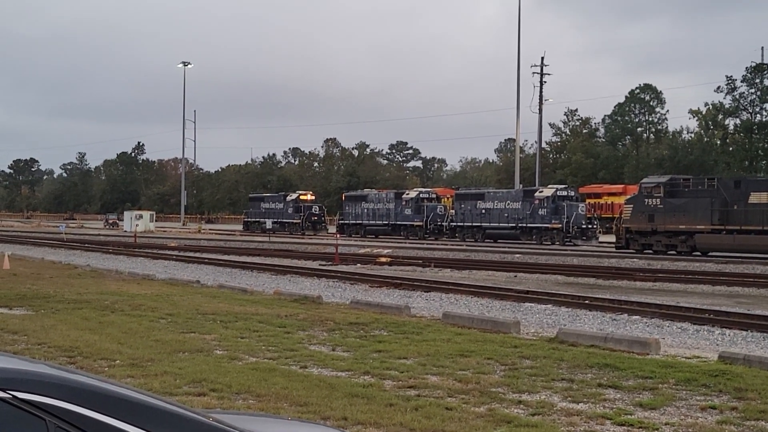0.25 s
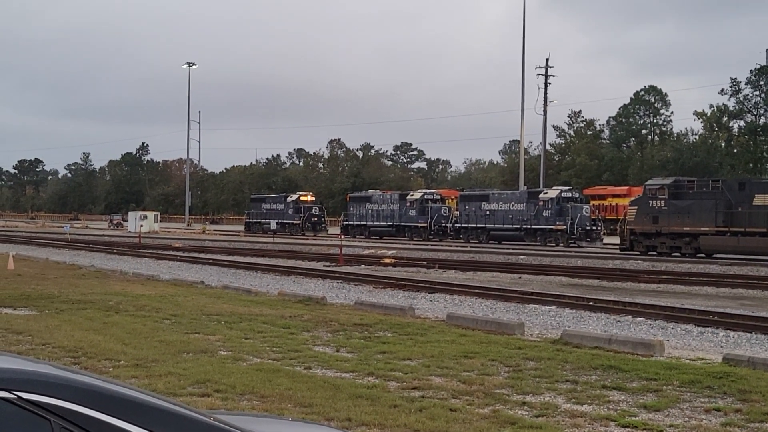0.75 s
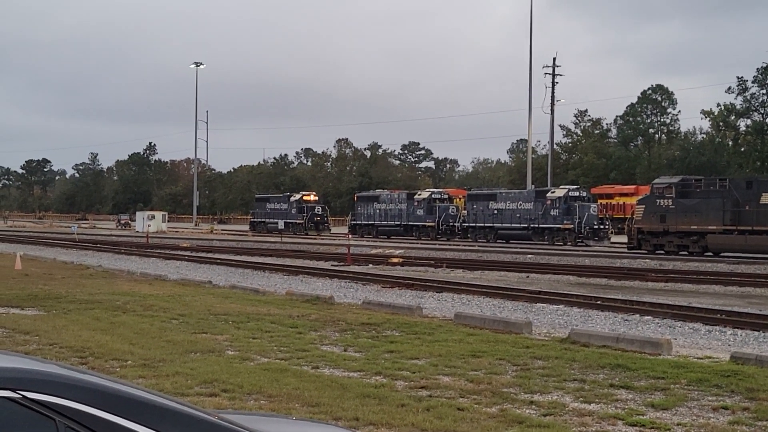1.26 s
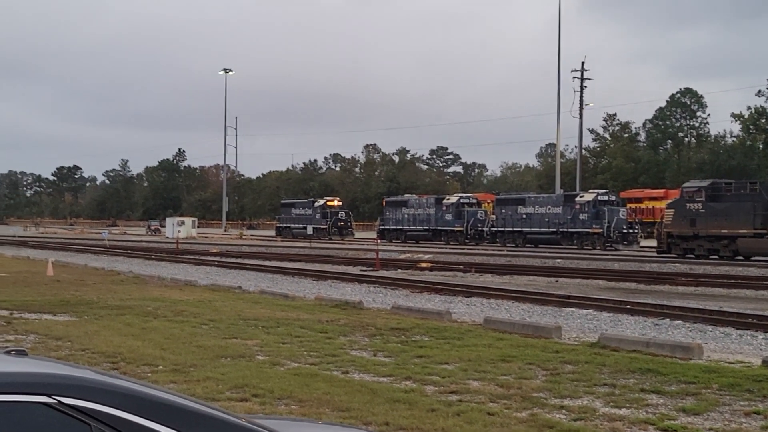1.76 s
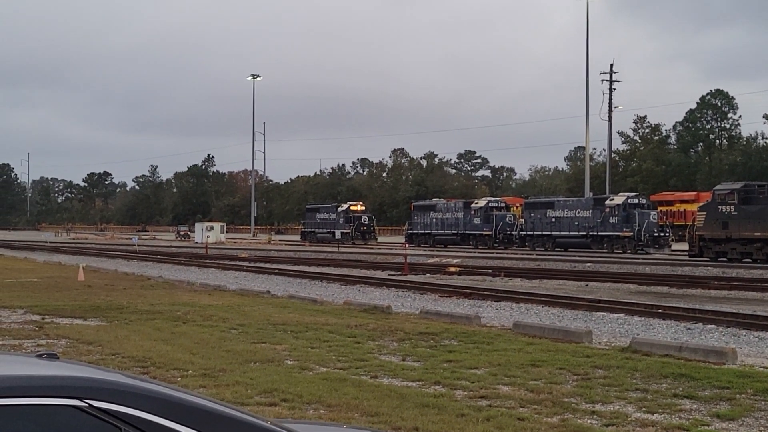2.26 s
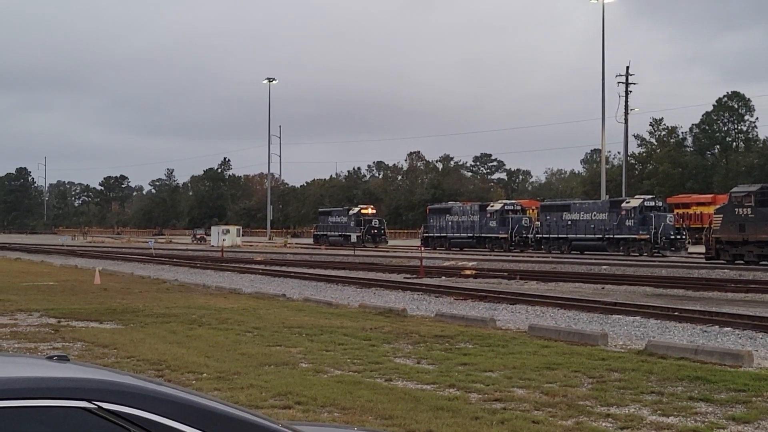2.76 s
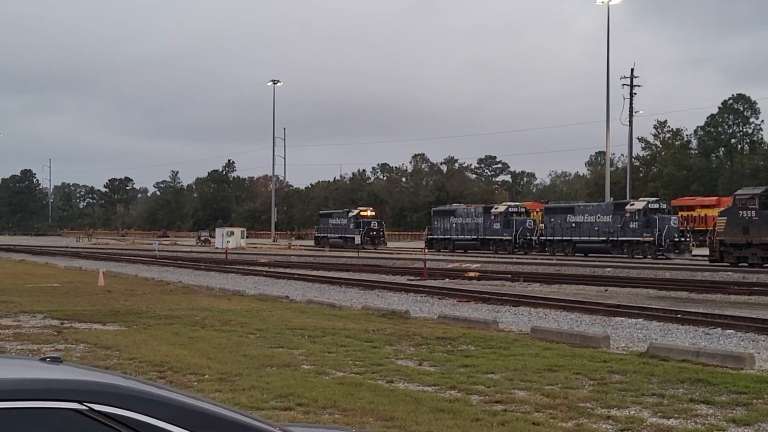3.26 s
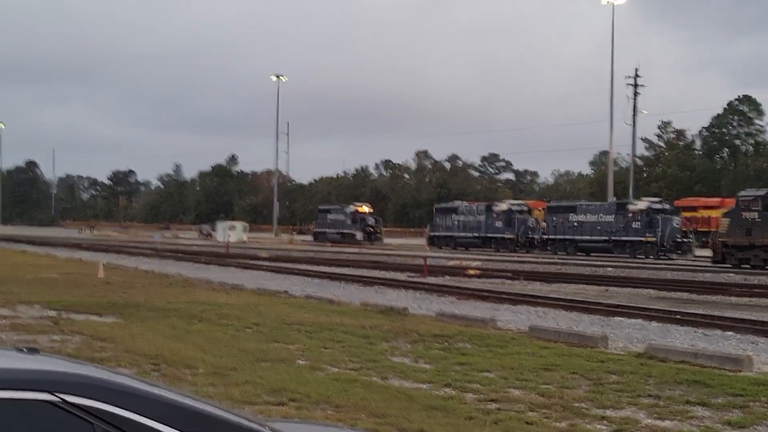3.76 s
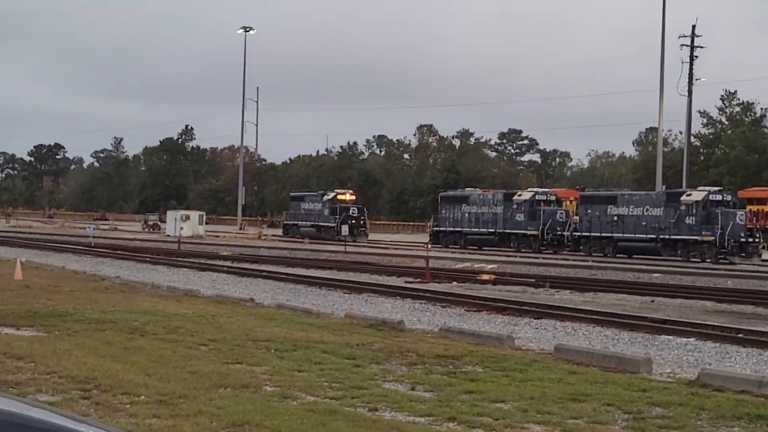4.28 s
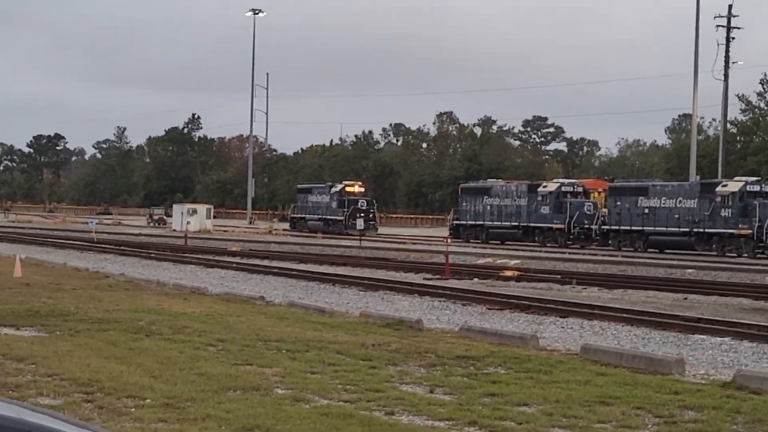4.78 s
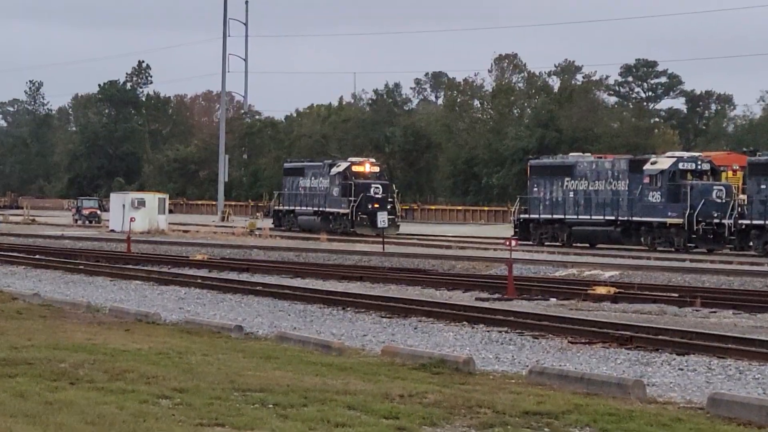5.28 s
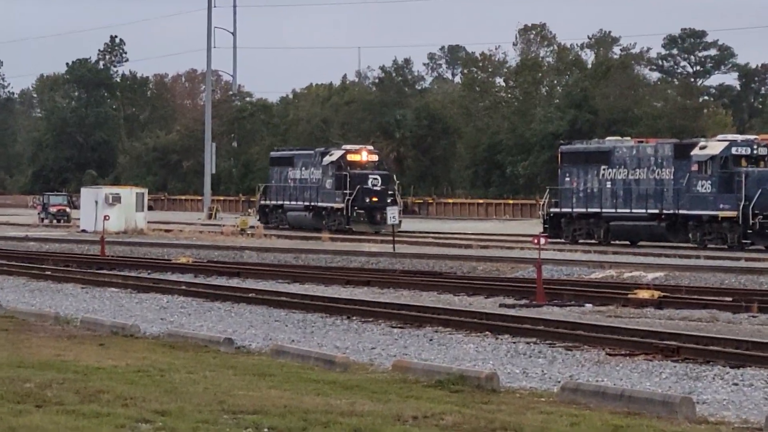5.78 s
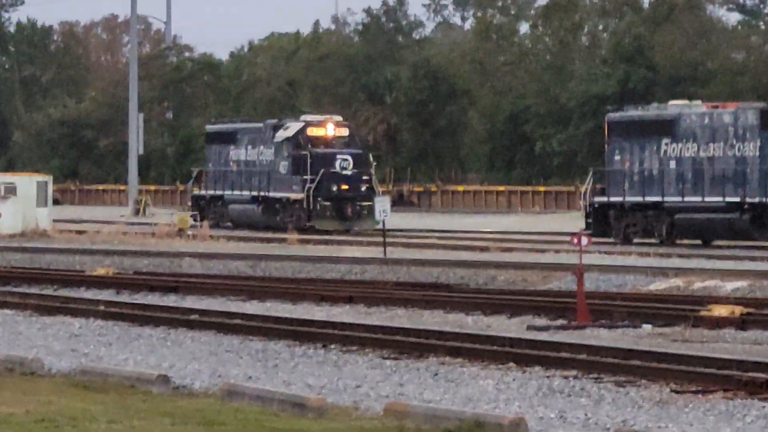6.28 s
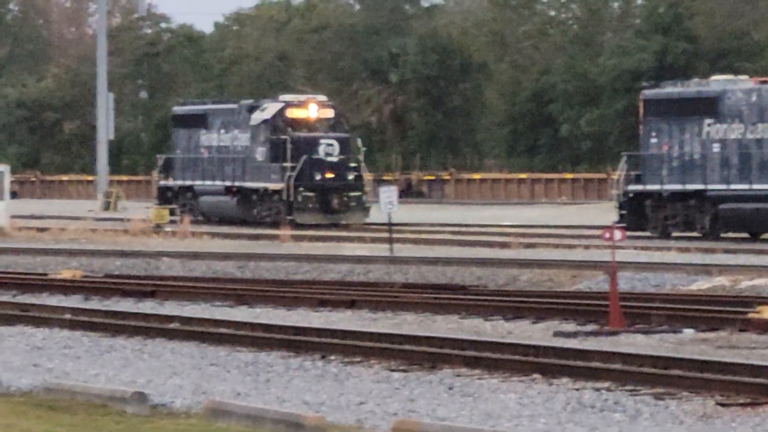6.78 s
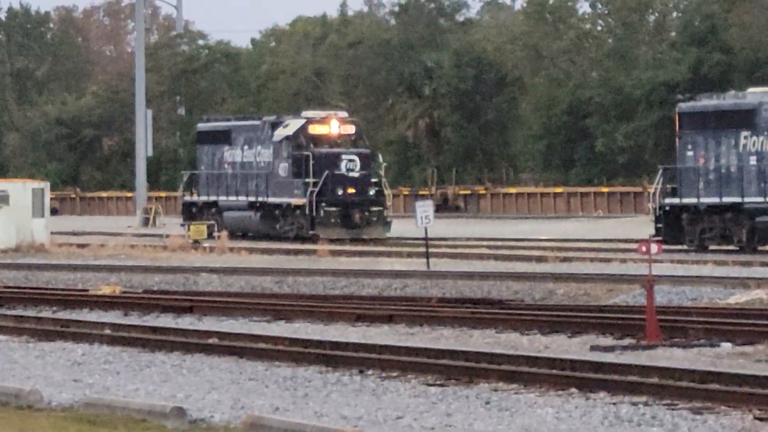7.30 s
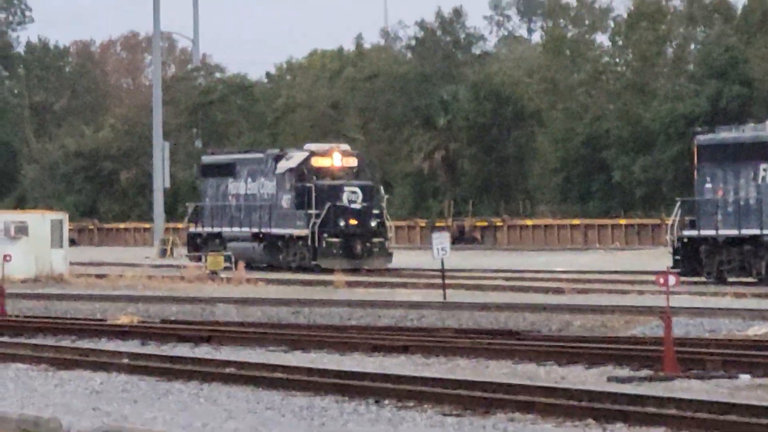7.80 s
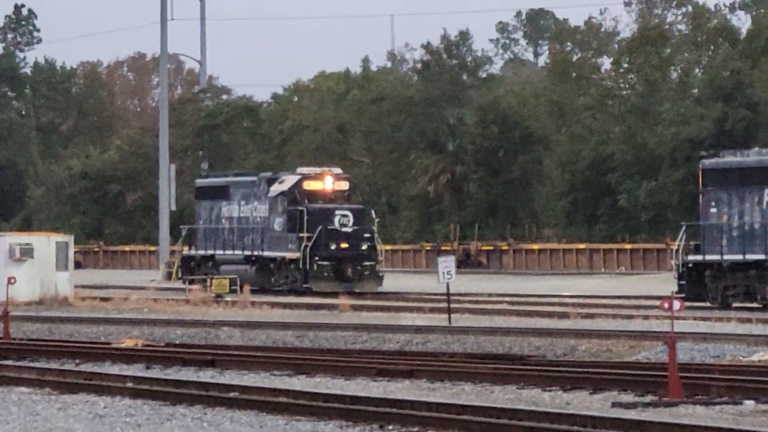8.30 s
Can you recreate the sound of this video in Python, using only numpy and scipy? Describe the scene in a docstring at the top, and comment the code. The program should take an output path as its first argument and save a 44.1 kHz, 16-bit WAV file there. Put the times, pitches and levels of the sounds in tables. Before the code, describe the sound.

Several diesel locomotives idle across an open rail yard with a steady, low throb. Couplers clank a few times and a brake shoe scrapes briefly, then the rumble grows a little as one unit creeps closer. Air valves let out short hisses, one engine winds down to a lower idle, and wheel flanges sing faintly. In the last seconds a light breeze thumps on the microphone.

```python
"""Four diesel locomotives throb across a rail yard, their exhaust tones beating against each other.
Early on a thin whistle comes and goes, and air valves begin to spit. Near 3 s couplers clank and one
unit starts to creep closer, so roar, fans and running gear grow. A brake shoe scrapes until about 4 s.
Then another engine winds down to low idle, its whine sinking with it, while wheel flanges sing and the
camera ticks as it is handled. From 6 s on, a light breeze buffets the microphone more often."""
import sys
import numpy as np
from scipy import signal
from scipy.fft import rfft, irfft, next_fast_len
from scipy.io import wavfile
from scipy.ndimage import uniform_filter1d, map_coordinates

SR = 44100
rng = np.random.default_rng(int(sys.argv[2]) if len(sys.argv) > 2 else 0)


def master_out(mix):
    """Clip the mix to full scale and print it as 16-bit PCM to the path in sys.argv[1]."""
    frames = np.transpose(np.atleast_2d(mix))
    ceiling = np.clip(frames, -1, 1)
    pcm = np.round(ceiling * 32767).astype(np.int16)
    wavfile.write(sys.argv[1], SR, pcm)


N = 376878

# The slowing engine's speed. Each row: time in seconds, working cycles per second.
SLOWING_SPEED = [(0, 3.177), (4.2, 3.172), (4.8, 3.14), (5.3, 3.06), (5.7, 2.95), (6.05, 2.8), (6.5, 2.64),
                 (7, 2.595), (8.55, 2.58)]
# Each engine's exhaust tones. Each row: multiple of its cycle rate, relative level in dB.
SLOWING_TONES = [(15, -41), (16, -27.5), (18, -32), (20, -37.5), (21, -38), (24, -41), (25, -37),
                 (26, -34.5), (28, -47), (30, -30.5), (32, -39), (34, -32.5), (48, -37)]
IDLE_TONES = [(9, -57), (12, -46), (15, -26), (16, -36), (17, -38), (18, -33), (20, -36), (21, -39),
              (23, -44), (25, -42), (27, -42), (28, -44), (31, -50), (33, -47), (48, -50)]
CREEP_TONES = [(10, -51), (13, -36), (16, -28.5), (17, -43), (19, -44)]
PARKED_TONES = [(10, -44), (13, -44), (15, -33.5), (16, -41), (18, -44), (21, -35.5), (23, -42), (25, -37),
                (32, -48), (33, -49)]
IDLE_HZ, CREEP_HZ, PARKED_HZ = 3.667, 4.431, 3.33  # cycle rates of the three steady engines
# The slowing engine's silencer, which its tones slide through. Each row: frequency in Hz, gain in dB.
SILENCER = [(41, 0), (46.5, -7), (50.5, 0), (88, -1), (95, -4), (102, -7), (108, -9), (125, -13),
            (152, -10)]
# How loud the exhausts, the hiss and the brake are. Each row: time in seconds, level in dB.
EXHAUST_LEVEL = [(0, -18.5), (2.6, -19.5), (3.3, -19.5), (4.2, -18.5), (5.3, -17.5), (6.4, -17.5),
                 (7.4, -18), (8.05, -16), (8.55, -17.5)]
HISS_LEVEL = [(0, -53.5), (3, -50), (3.65, -50.5), (4.5, -44), (5.2, -42.5), (6.5, -43.5), (7.4, -45),
              (8.55, -44)]
BRAKE_LEVEL = [(3.5, -100), (3.62, -45), (3.76, -41), (3.9, -39.5), (3.97, -37), (3.995, -42), (4.12, -100)]
# Brief dips in level. Each row: middle and width in seconds, depth in dB for exhaust and for roar.
DIPS = [(.6, 0.12, 3, 5.5), (3.6, 0.2, 0.5, 5), (6.72, 0.077, 9.5, 11.5), (7.5, 0.076, 1.5, 2.5)]
# The creeping unit's approach. Each row: time in seconds, nearness from 0 (far) to 1 (near).
APPROACH = [(0, 0.07), (2.7, 0), (4.2, 0.42), (5, 0.72), (6.4, 1), (7.4, 0.87), (8.55, 0.82)]
GEAR_GAIN_DB = 6.5  # what running gear and chirps gain as it nears
# The tone colour of each noise. Each row: frequency in Hz, relative level in dB.
RUMBLE_COLOUR = [(15, -4), (25, -6.5), (32, 0), (42, -6), (55, -4), (72, -3), (100, -11), (130, -13),
                 (200, -32), (400, -62)]
ROAR_COLOUR = [(60, -36), (105, -0.5), (155, 1), (240, -4.5), (330, -11.5), (450, -23), (700, -22.5),
               (1500, -74)]
FAN_COLOUR = [(200, -3), (400, -5.5), (520, -2.5), (620, -7), (800, -2.5), (1000, -4), (1250, -8),
              (2000, -13), (5000, -69)]
FAR_GEAR_COLOUR = [(650, -30), (1100, 1), (1190, -2), (1360, 2.5), (1680, -2), (1830, 1), (2320, -2),
                   (2680, -2.5), (2880, 2), (3170, -4), (3450, -1), (4130, -6), (4600, -10), (5980, -12),
                   (10100, -120)]
NEAR_GEAR_COLOUR = [(650, -33), (1100, -2), (1270, 2), (1450, 5.5), (1680, 3), (1820, 2), (2180, -1.5),
                    (2950, 2), (3190, -1), (3780, -10.5), (4150, -7), (4360, -10.5), (4600, -29),
                    (5980, -52), (10100, -120)]
HISS_COLOUR = [(3000, -7.5), (4200, -3.5), (4900, 4), (5800, -2.5), (6600, 2), (7300, -1.5), (8300, -4),
               (9300, -10), (11000, -12.5), (13500, -11), (15600, -12)]
DRYER_COLOUR = [(1500, -28), (2700, -7), (3350, 1), (4200, -5), (4850, -1), (5800, -5), (7400, -5),
                (8000, 2.5), (8600, 2.5), (9200, -8), (12000, -11.5), (14500, -15), (15800, -21)]
BRAKE_COLOUR = [(700, -45), (1400, -13), (1900, -12), (2200, 0), (2370, 4), (2450, -12), (2530, 6),
                (2750, -6), (2990, 2), (3200, -2), (3520, -6), (3750, -13), (3990, -2.5), (4600, -10),
                (9000, -35)]
# Surges of the whine. Each row: start, length, fade-in and time to fade 60 dB in seconds, level in dB.
WHINE_SURGES = [(.06, .28, .07, 1.2, -60), (1.1, .8, .3, 1.2, -66), (2.3, .22, .12, .13, -49.5),
                (4.2, .8, .4, 2.5, -60), (5.85, .24, .12, .35, -54), (6.3, .31, .16, .7, -52),
                (6.8, .45, .14, .7, -55), (6.955, .055, .045, .6, -50), (7.125, .055, .04, .5, -56)]
# Swells of the electrical whistle. Each row: peak time and width in seconds, level in dB.
WHISTLE_SWELLS = [(.05, .08, -64), (.33, .12, -59), (1.25, .22, -64), (1.75, .1, -67), (2.2, .15, -68),
                  (2.78, .2, -65)]
# Blower tones. Each row: pitch in Hz, level in dB with the creeping unit far, dB added when it is near.
BLOWERS = [(680, -66, 2), (777.5, -64.5, 7), (1000, -68, 2), (1338, -67, 5), (1414, -67, 2), (3500, -64, 0)]
# Coupler knocks. Each row: start in seconds, level in dB, seconds to fade 60 dB, pitch in Hz,
# sharpness of that pitch (Q), share of rattle from 0 to 1.
CLANKS = [(2.562, -42.5, .35, 2900, .6, .35), (3.095, -37.5, .25, 2200, 2, .35),
          (3.404, -37, .3, 2100, 1.5, .6), (3.417, -29, .33, 2500, 1.1, .65),
          (3.452, -35.5, .55, 2650, 1.5, .7), (3.512, -38, .12, 3090, 6, .3)]
# The notes at which the couplers' steel rings. Each row: pitch in Hz, relative level in dB.
STEEL_NOTES = [(1820, 0), (1949, -5), (2170, -1.5), (2680, -5), (3090, 11), (3370, 6), (3494, 16),
               (3725, 8), (3930, 2), (4393, 1)]
# Air valve spits. Each row: start and length in seconds, level in dB, pitch in Hz, sharpness (Q),
# seconds to fade 60 dB.
SPITS = [(1.267, 0.018, -41.5, 3080, 0.91, 0.5), (2.929, 0.74, -47, 3200, 2.2, 0.58),
         (4.758, 0.039, -41, 6460, 1.7, .1), (5.158, 0.08, -37, 2200, 1.5, .15),
         (5.256, 0.01, -35, 3750, 0.98, 0.068), (6.464, 0.063, -36, 2760, 1.26, 0.59),
         (8.132, 0.045, -39, 2750, 2.3, 0.26)]
# Flange notes. Each row: start, length, fade-in and time to fade 60 dB in seconds, pitch in Hz,
# level in dB.
FLANGE_NOTES = [(.95, .45, .12, .4, 1007, -57), (4.65, .42, .14, .5, 2022, -49.5),
                (5.15, .11, .04, .3, 2022, -48.5), (5.32, .09, .03, .3, 2130, -53),
                (5.87, .15, .04, .4, 3332, -52), (6.08, .32, .08, .4, 3025, -50.5),
                (6.23, .05, .02, .15, 7560, -54), (6.85, .45, .15, .8, 2912, -53),
                (6.95, .85, .3, .8, 1825, -53.5)]
# Gusts. Each row: peak time and width in seconds, level in dB, pitch in Hz as it builds and as it dies.
GUSTS = [(0.081, 0.014, -46, 276, 276), (0.198, 0.026, -30, 147, 159), (.35, 0.054, -41, 258, 258),
         (2.21, 0.016, -36.5, 220, 240), (2.43, 0.042, -32, 207, 209), (4.53, 0.021, -31, 160, 160),
         (4.78, 0.034, -37.5, 230, 228), (6.145, 0.017, -21, 150, 158), (6.255, .03, -26.5, 149, 135),
         (6.45, .03, -23, 149, 240), (6.5, 0.032, -29, 287, 285), (6.66, 0.021, -32, 203, 195),
         (6.915, .036, -24.5, 217, 190), (7.12, 0.056, -26.5, 170, 158), (7.275, 0.015, -25, 165, 152),
         (7.4, 0.025, -26.5, 165, 231), (7.615, 0.018, -32, 378, 330), (7.655, 0.023, -28, 230, 190),
         (7.91, 0.02, -37.5, 260, 260), (8.08, 0.04, -23, 182, 175), (8.42, .04, -33, 170, 170)]
# Handling ticks. Each row: start in seconds, level in dB, seconds to fade 60 dB, pitch and width of
# the ring in Hz, level of the bright edge in dB relative to the ring.
TICKS = [(4.2528, -21.5, .008, 6400, 2600, -13), (5.188, -26.5, .009, 11000, 6000, -8),
         (6.1203, -18.5, .007, 6600, 1100, -.5)]
# How alike noise is on the left and right. Each row: frequency in Hz, likeness (1 or more is identical).
STEREO_LIKENESS = [(50, -0.1), (110, 1.15), (250, 3.5), (500, 0.47), (1000, 0.66), (2000, 0.83),
                   (4000, -0.16), (8000, 0.1), (14000, 0)]
# The yard's stereo balance. Each row: frequency in Hz, left minus right level in dB.
STEREO_BALANCE = [(60, -0.5), (110, -2.5), (200, 0), (380, -1), (700, -0.5), (1290, -0.5), (2380, -1.0),
                  (4400, -1.5), (8120, -4.5), (15000, -7)]
# The yard's stereo timing. Each row: frequency in Hz, radians by which left leads (negative is late).
STEREO_PHASE = [(0, 0), (250, -.1), (700, -1.2), (1200, -3.1), (1900, -5.5), (2900, -7.2), (4100, -12.3),
                (4900, -13.5), (6400, -12.3), (7600, -13.6), (9300, -11.6), (16000, -12.5)]


def engines(rumble_db=-11.5, bass_cut_hz=47):
    """Four exhausts beat together over the swirling gas in their stacks, which give off little deep bass."""
    slowing = exhaust(curves(SLOWING_SPEED)[0], SLOWING_TONES)
    slowing = filtered(slowing, lambda hz: amp(along(SILENCER, hz)))
    tones = slowing + exhaust(IDLE_HZ, IDLE_TONES) + exhaust(CREEP_HZ, CREEP_TONES)
    tones += exhaust(PARKED_HZ, PARKED_TONES)
    tones = unit(filtered(tones, lambda hz: 1 / np.sqrt(1 + (bass_cut_hz / (hz + 1)) ** 16)))
    rumble = amp(rumble_db) * rush(RUMBLE_COLOUR, patchy_db=-.5)
    return amp(curves(EXHAUST_LEVEL)[0]) * (tones + rumble)


def exhaust(cycle_hz, tones):
    """Unequal cylinders make tones at multiples of the cycle rate; the governor lets the speed drift."""
    angle = 2 * np.pi * np.cumsum(cycle_hz * (1 + .0015 * wobble(3))) / SR
    return sum(amp(db) * np.sin(round(k) * angle + rng.uniform(0, 2 * np.pi)) for k, db in tones)


def roar(chuff=.23, thump_db=-4):
    """The low roar swells with each firing of the slowing engine, whose stack also thumps."""
    noise = rush(ROAR_COLOUR, patchy_db=.8, likeness=[(100, .55), (400, .55)])
    chuffing = unit(firing_beat(chuff) * noise)
    return approaching(far_db=-35.5, gain_db=6.5, waver_db=.67) * unit(chuffing + amp(thump_db) * thumps())


def thumps(uneven_db=5, stack_hz=(75, 190)):
    """Each firing rings the stack; strong and weak cylinders return every cycle, so the engine chugs."""
    fired = firing_count().astype(int)
    at = np.flatnonzero(np.diff(fired))
    strengths = amp(uneven_db * unit(rng.standard_normal(16)))
    pulses = np.zeros(N)
    pulses[at] = strengths[fired[at] % len(strengths)] * amp(2 * rng.standard_normal(len(at)))
    stack = signal.butter(3, stack_hz, "bandpass", fs=SR, output="sos")
    return unit(signal.sosfilt(stack, pulses))


def machinery(clatter=.059):
    """Cooling fans, running gear and a far hiss; the last two pulse with the valve gear's clatter."""
    near = nearness()
    fans = approaching(far_db=-45, gain_db=4, waver_db=.4) * rush(FAN_COLOUR, patchy_db=.7)
    gear = np.sqrt(1 - near) * rush(FAR_GEAR_COLOUR, patchy_db=1.57)
    gear += np.sqrt(near) * rush(NEAR_GEAR_COLOUR, patchy_db=1.46)
    gear *= approaching(far_db=-44.5, gain_db=GEAR_GAIN_DB, waver_db=-.24)
    hiss = amp(curves(HISS_LEVEL)[0]) * rush(HISS_COLOUR, patchy_db=2)
    shimmer = amp(.6 * wobble(24))
    return fans + (gear + hiss) * shimmer * firing_beat(clatter)


def whines(gear_ratio=1691, steady_db=-72.5):
    """The slowing engine's whine, an electrical whistle and blowers all flutter in the moving air."""
    near, t = nearness(), clock()
    whine = tone(gear_ratio * curves(SLOWING_SPEED)[0], blur=.0125, rate=520) * amp(2.5 * wobble(70))
    surges = sum(amp(db) * burst(t - s, length, t60, rise) for s, length, rise, t60, db in WHINE_SURGES)
    whistle = tone(6830, blur=.0015, rate=160) + amp(-11) * tone(13660, blur=.0008, rate=80)
    whistle *= amp(3.6 * wobble(30))
    swells = sum(amp(db) * bell(s, width) for s, width, db in WHISTLE_SWELLS)
    blowers = sum(amp(db + gain_db * near + 2.5 * wobble(6)) * tone(hz, blur=.005, rate=40)
                  for hz, db, gain_db in BLOWERS)
    return (amp(steady_db) + surges) * whine + swells * whistle + blowers


def couplers(rattle_top_hz=8000):
    """Slack runs through the couplers: each knock rings the steel, over a rattle dulled by distance."""
    out, t, hz = blank_events()
    steel = [(note_hz, amp(db) * tone(note_hz, blur=.009, rate=220)) for note_hz, db in STEEL_NOTES]
    for s, db, t60, pitch_hz, q, share in CLANKS:
        at = round(s * SR)
        ring = unit(sum(band(note_hz, pitch_hz, q) * note[at:][:len(t)] for note_hz, note in steel))
        colour = band(hz, pitch_hz, q) / np.sqrt(1 + (hz / rattle_top_hz) ** 4)
        rattle = unit(irfft(rfft(stereo_noise(t)) * colour))
        knock = np.sqrt(1 - share) * ring + np.sqrt(share) * rattle
        add_at(out, s, amp(db) * knock * burst(t, 0, t60, rise=.004))
    return out[:, :N]


def brake_shoe(slip_db=2.5):
    """The shoe sticks and slips on the wheel in uneven grains, scrapes ever harder, then lets go."""
    slips = amp(slip_db * wobble(110))
    return amp(curves(BRAKE_LEVEL)[0]) * unit(slips * rush(BRAKE_COLOUR, patchy_db=2.5))


def air_valves():
    """Drain valves spit short jets, each a broad band of noise around one pitch."""
    out, t, hz = blank_events()
    for s, length, db, jet_hz, q, t60 in SPITS:
        jet = unit(irfft(rfft(stereo_noise(t)) * band(hz, jet_hz, q)))
        add_at(out, s, amp(db) * jet * burst(t, length, t60, rise=.0059))
    return out[:, :N]


def air_dryer(start_s=5.253, level_db=-33.8, sag_db_per_s=14):
    """The air dryer blows out once; its jet weakens as the pressure falls."""
    t = clock() - start_s
    gain = amp(level_db - sag_db_per_s * np.maximum(t, 0))
    return gain * burst(t, length=.18, t60=.33, rise=.004) * rush(DRYER_COLOUR, patchy_db=.8)


def flanges():
    """Flanges, the wheels' guiding rims, rub the rail and sing, one note to each rub."""
    out = np.zeros(N)
    for s, length, rise, t60, hz, db in FLANGE_NOTES:
        note = amp(db + 3.2 * wobble(42)) * tone(hz, blur=.0065, rate=220)
        out += note * burst(clock() - s, length, t60, rise)
    return out


def chirps(count=40, low_hz=1740, high_hz=3344, faintest_db=-57.5, spread_db=8):
    """Brief, faint chirps sound at random times and scattered high pitches."""
    out, t = np.zeros(N + SR), np.arange(SR // 4) / SR
    for when, pitch, size, glide in rng.uniform(size=(count, 4)):
        slide = 1 + .18 * (2 * glide - 1) * t  # up or down by at most 18% a second
        hz = low_hz * (high_hz / low_hz) ** pitch * slide
        chirp = np.sqrt(2) * np.sin(2 * np.pi * np.cumsum(hz) / SR)
        chirp *= burst(t, length=.032, t60=.2, rise=.012)
        add_at(out, when * N / SR, amp(spread_db * size) * chirp)
    return amp(faintest_db + GEAR_GAIN_DB * nearness()) * out[:N]


def breeze(q=1.1, top_ratio=1.64):
    """Short gusts thump on the microphone, most of them shifting in pitch as they pass."""
    out, t, hz = blank_events()
    half = len(t) // 2
    # A gust has very little sound above top_ratio times its pitch.
    colour = lambda pitch_hz: band(hz, pitch_hz, q) / np.sqrt(1 + (hz / (top_ratio * pitch_hz)) ** 10)
    for s, width, db, early_hz, late_hz in GUSTS:
        from_peak = (t - t[half]) / width
        shape = np.exp(-.5 * from_peak ** 2)
        late = .5 + .5 * np.tanh(from_peak)
        air = rfft(stereo_noise(t, shared=1.2))
        eddy = shape * ((1 - late) * irfft(air * colour(early_hz)) + late * irfft(air * colour(late_hz)))
        add_at(out, s, amp(db) * unit(eddy) * np.sqrt(np.mean(shape ** 2)))
    return out[:, half:][:, :N]  # moves each peak to its listed time


def ticks(edge_hz=15000, edge_width_hz=2800, side_db=4.5):
    """Tiny scrapes ring the camera's case, nearer the right side of the microphone."""
    out, t = np.zeros((2, N + SR)), np.arange(SR // 20) / SR
    for s, db, t60, ring_hz, ring_width_hz, edge_db in TICKS:
        scrape = stereo_noise(t) * amp(-60 * t / t60)
        for hz, width, offset_db in [(ring_hz, ring_width_hz, 0), (edge_hz, edge_width_hz, edge_db)]:
            case = signal.iirpeak(hz, hz / width, SR)
            ring = signal.lfilter(*case, signal.lfilter(*case, scrape))
            add_at(out, s, amp(db + offset_db) * ring / np.abs(ring).max(axis=1, keepdims=True))
    return out[:, :N] * amp([[-side_db], [side_db]])


def firing_count():
    """How many times the slowing engine's sixteen cylinders have fired so far."""
    return np.cumsum(16 * curves(SLOWING_SPEED)[0]) / SR


def firing_beat(depth):
    """A gain that swings around 1 with each of those firings."""
    return 1 + depth * np.cos(2 * np.pi * firing_count())


def nearness():
    """How near the creeping unit has come, from 0 to 1."""
    return curves(APPROACH)[0]


def approaching(far_db, gain_db, waver_db):
    """A gain that grows as the unit nears and wavers in the moving air."""
    return amp(far_db + gain_db * nearness() + waver_db * wobble(4.2))


def rush(colour, patchy_db, likeness=STEREO_LIKENESS):
    """Stereo noise of level 1, with louder and softer patches from the moving air."""
    grid = signal.stft(rng.standard_normal((2, N)), nperseg=512)[2]
    patches = uniform_filter1d(rng.standard_normal(grid.shape[1:]), size=7, axis=0)  # smooth in pitch
    patches = uniform_filter1d(patches, size=10, axis=1)  # and in time
    pair = signal.istft(grid * amp(patchy_db * unit(patches)), nperseg=512)[1][:, :N]
    spread = lambda hz: np.arccos(np.clip(along(likeness, hz), -1, 1)) / 2
    mid, side = filtered(pair, lambda hz: amp(along(colour, hz)) * [np.cos(spread(hz)), np.sin(spread(hz))])
    return unit(np.array([mid + side, mid - side]))


def stereo_noise(t, shared=1):
    """White noise that left and right partly share."""
    return rng.standard_normal((2, len(t))) + shared * rng.standard_normal(len(t))


def tone(hz, blur, rate):
    """A sine wave of level 1 whose pitch wanders by the fraction blur."""
    return np.sqrt(2) * np.sin(2 * np.pi * np.cumsum(hz * (1 + blur * wobble(rate))) / SR)


def wobble(rate):
    """A smooth curve through rate random values a second."""
    knots = rng.standard_normal(int(N * rate / SR) + 4)
    coarse = np.arange(0, N + 32, 32)
    return np.interp(np.arange(N), coarse, map_coordinates(knots, [coarse * rate / SR], mode="nearest"))


def burst(t, length, t60, rise):
    """A gain that rises, holds until length, then fades 60 dB every t60 seconds."""
    return np.clip(t / rise, 0, 1) * amp(-60 * np.maximum(t - length, 0) / t60)


def bell(s, width):
    """A smooth rise to 1 and fall around the time s."""
    return np.exp(-.5 * ((clock() - s) / width) ** 2)


def band(hz, centre_hz, q):
    """The gain of a soft band around a pitch; a higher q is narrower."""
    return 1 / (1 + (q * (hz / centre_hz - centre_hz / hz)) ** 2)


def filtered(x, response):
    """Multiply each frequency in x by response(hz)."""
    size = next_fast_len(N + SR // 4, real=True)
    return irfft(rfft(x, size) * response(np.fft.rfftfreq(size, 1 / SR)), size)[..., :N]


def along(points, hz):
    """Read between a table's rows on a log frequency scale."""
    row_hz, values = np.transpose(points)
    return np.interp(np.log(hz + 1), np.log(row_hz + 1), values)


def curves(rows):
    """One value per sample for each column after the time."""
    times, *columns = np.transpose(rows)
    return [np.interp(clock(), times, column) for column in columns]


def blank_events():
    """A silent stereo track, plus the times and frequencies for a half-second event."""
    t = np.arange(SR // 2) / SR
    return np.zeros((2, N + SR)), t, np.fft.rfftfreq(len(t), 1 / SR) + 1


def add_at(track, s, sound):
    """Mix a sound in, starting at s seconds."""
    track[..., round(s * SR):][..., :sound.shape[-1]] += sound


def amp(db):
    """Turn dB into a gain."""
    return 10 ** (np.asarray(db) / 20)


def unit(x):
    """Scale to an average (rms) level of 1."""
    return x / np.sqrt(np.mean(x ** 2) + 1e-20)


def clock():
    """Each sample's time in seconds."""
    return np.arange(N) / SR


def scene():
    """The yard lies to one side, so it reaches left and right apart; gusts and ticks are at the camera."""
    dips_db = sum(np.outer(depths, bell(s, width)) for s, width, *depths in DIPS)
    exhaust_gain, roar_gain = amp(-dips_db)
    yard = exhaust_gain * engines() + roar_gain * roar() + machinery() + whines()
    yard += flanges() + chirps() + couplers() + brake_shoe() + air_valves() + air_dryer()
    sides = np.array([[.5], [-.5]])
    balance = lambda hz: amp(sides * along(STEREO_BALANCE, hz))
    timing = lambda hz: np.exp(1j * sides * np.interp(hz, *np.transpose(STEREO_PHASE)))
    return filtered(yard, lambda hz: balance(hz) * timing(hz)) + breeze() + ticks()


def record(dry):
    """The camera keeps nothing above 15830 Hz."""
    return filtered(dry, lambda hz: hz < 15830)


dry = scene()
out = record(dry)
master_out(out)
```